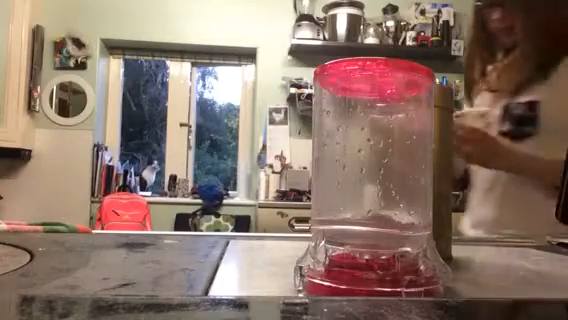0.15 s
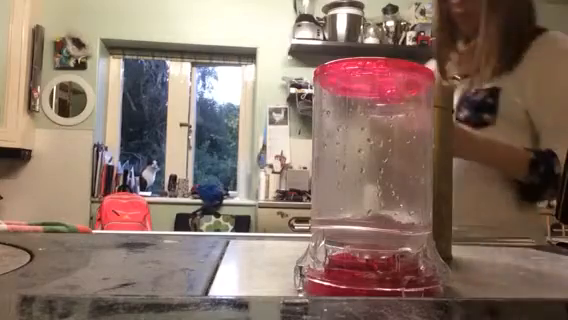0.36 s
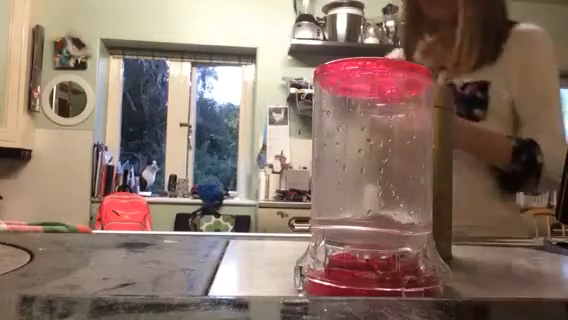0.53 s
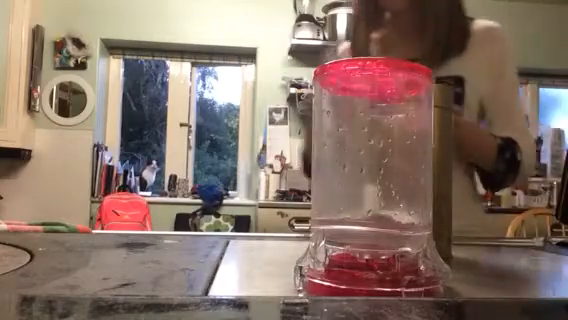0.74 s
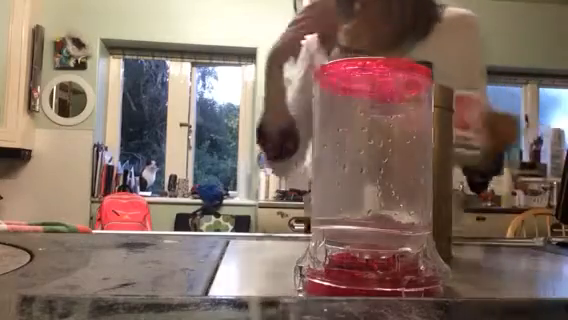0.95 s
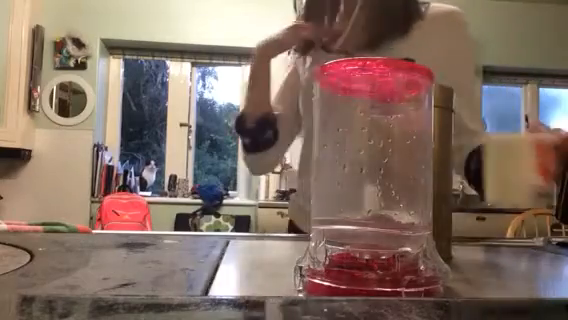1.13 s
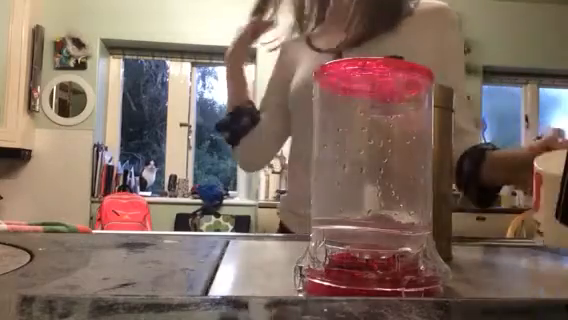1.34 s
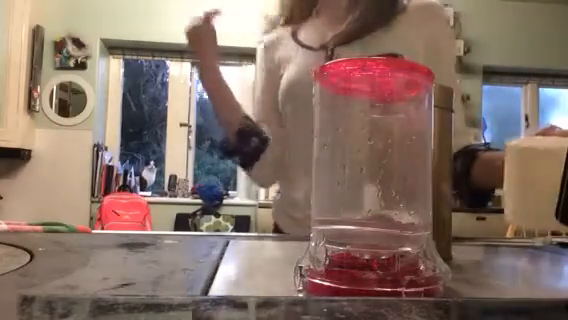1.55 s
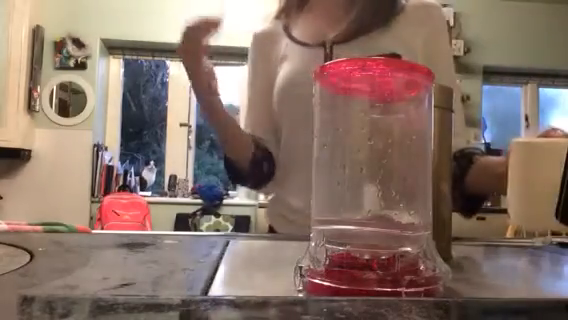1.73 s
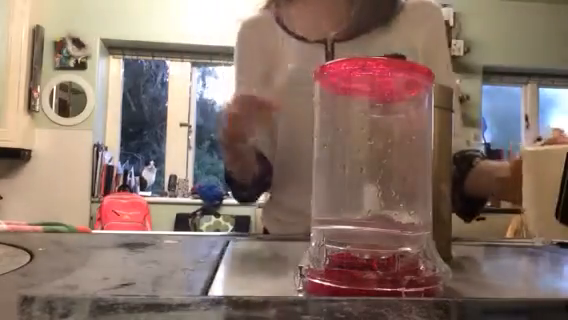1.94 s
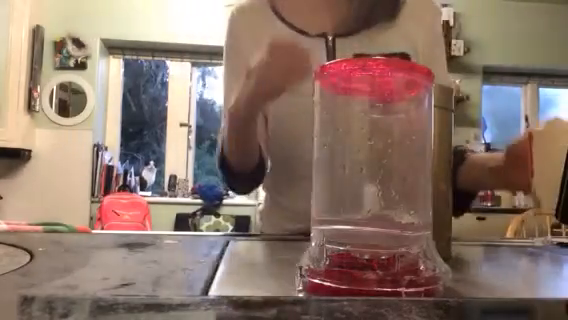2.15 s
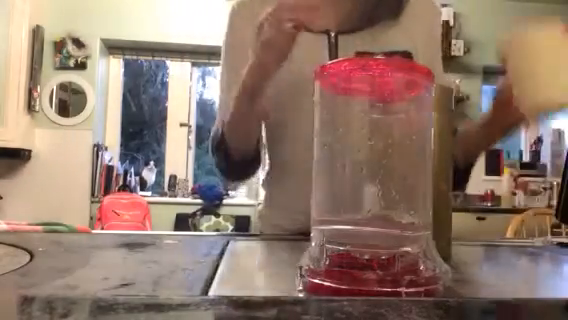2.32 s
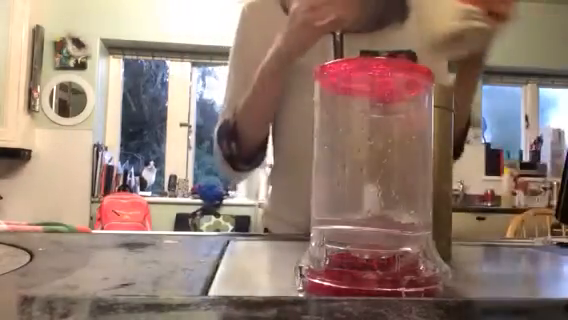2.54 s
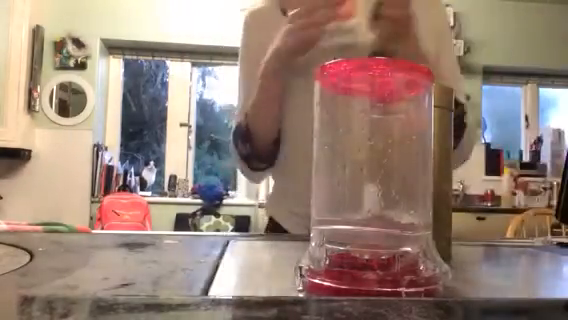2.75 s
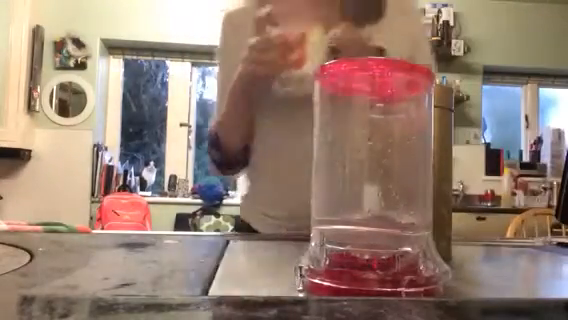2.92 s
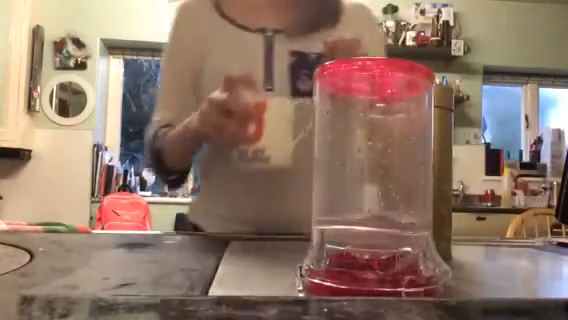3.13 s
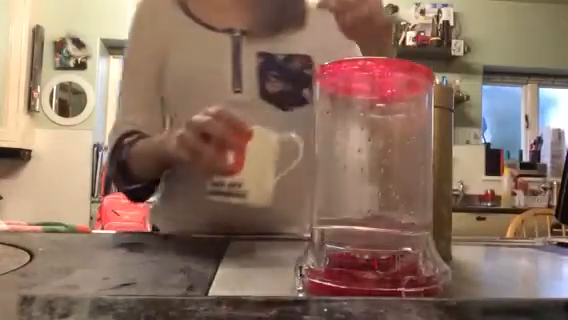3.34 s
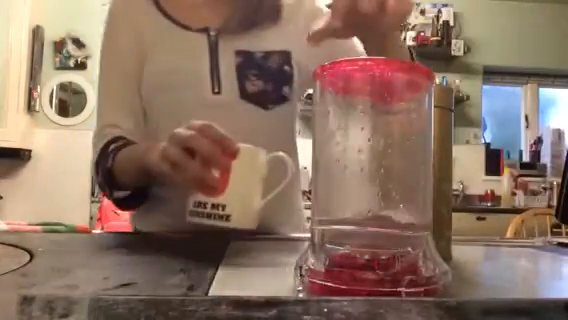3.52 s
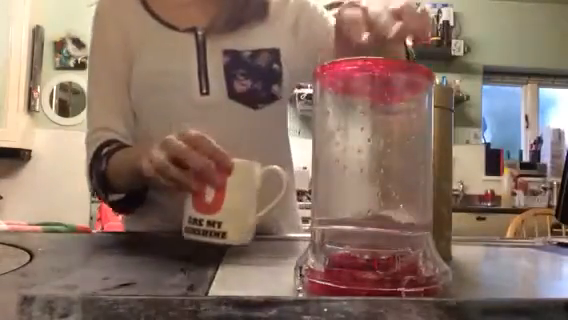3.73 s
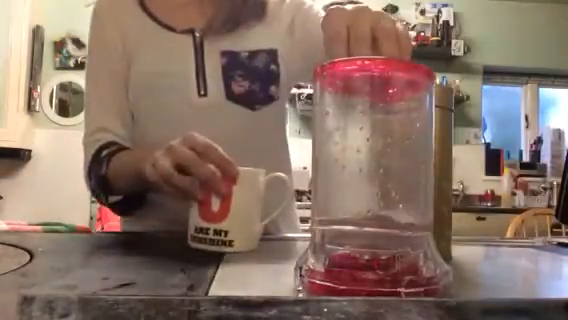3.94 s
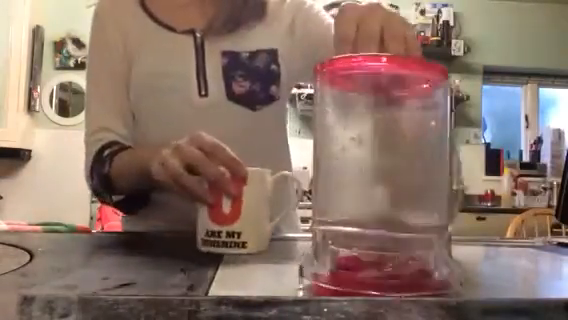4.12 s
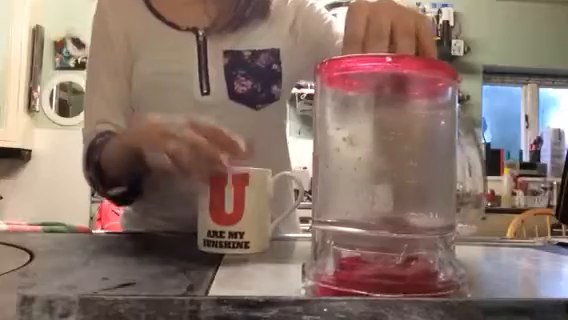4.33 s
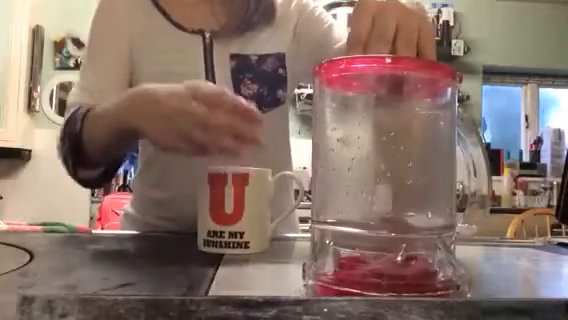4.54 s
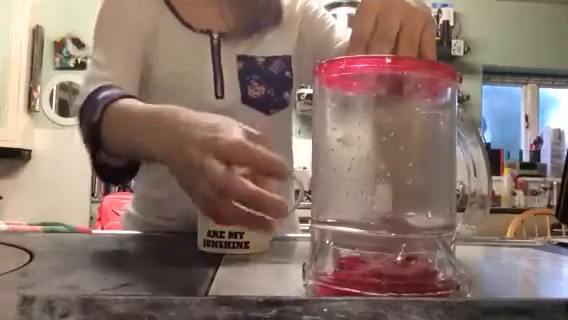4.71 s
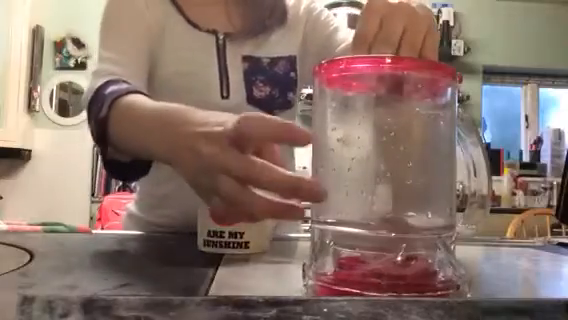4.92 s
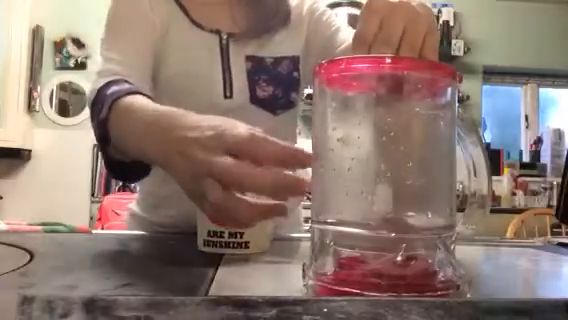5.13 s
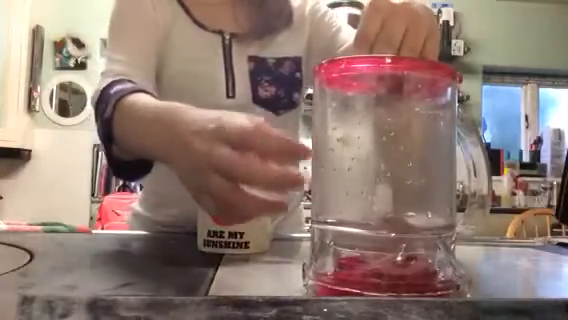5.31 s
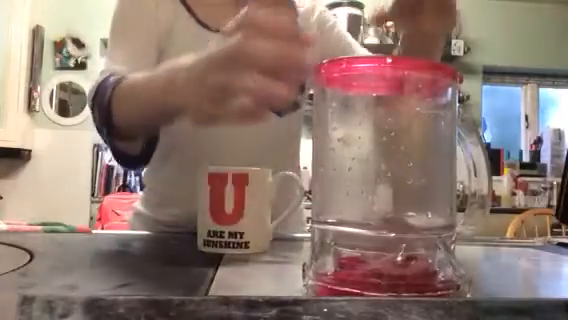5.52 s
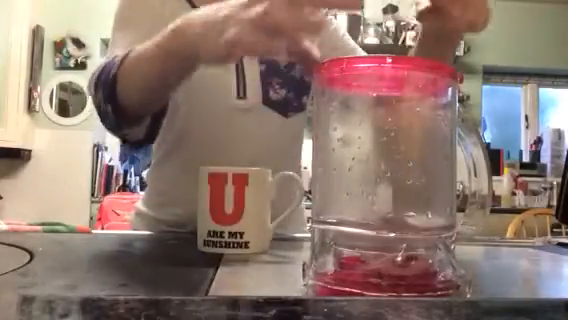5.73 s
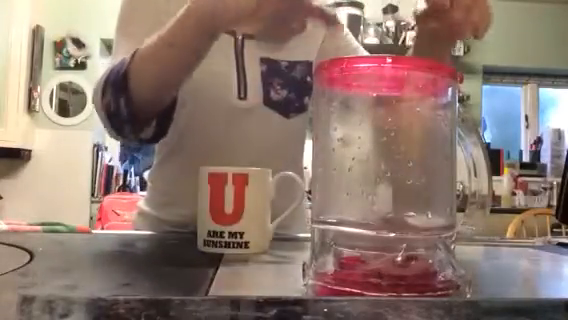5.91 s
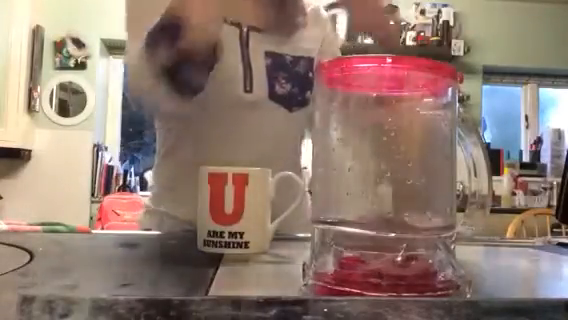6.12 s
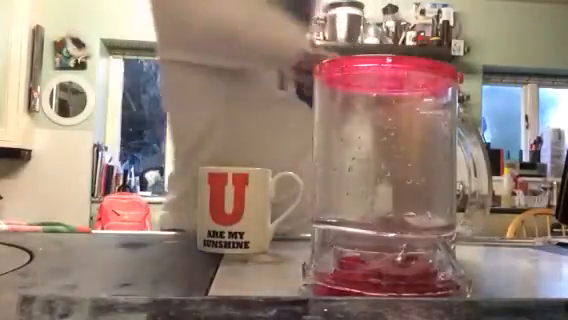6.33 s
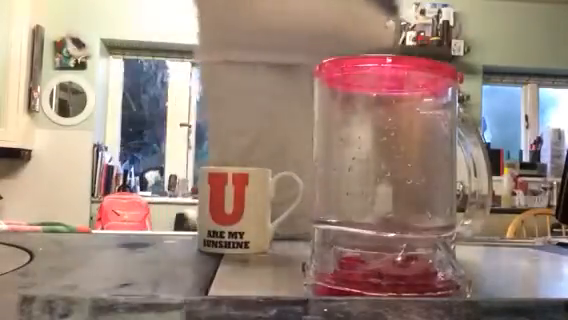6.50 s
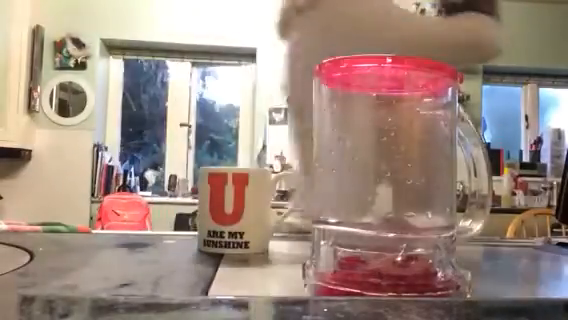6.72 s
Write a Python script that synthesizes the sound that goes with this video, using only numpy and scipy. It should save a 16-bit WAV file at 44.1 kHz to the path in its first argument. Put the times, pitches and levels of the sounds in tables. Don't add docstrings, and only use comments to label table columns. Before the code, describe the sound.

In a small hard kitchen, an appliance fan hisses steadily with a faint low hum. A few dull bumps come from further off. Then a ceramic mug lands with a loud sharp clunk on the worktop, grinds and rocks, clunks again flat and settles with tiny knocks. About a second later, nails tick and fingertips tap a hollow plastic jar. One close small microphone picks up low worktop wobbles.

```python
import sys
import numpy as np
from scipy import signal
from scipy.fft import rfft, irfft, next_fast_len
from scipy.io import wavfile

SR = 44100
rng = np.random.default_rng(int(sys.argv[2]) if len(sys.argv) > 2 else 0)


def unload_audio(sound):
    columns = np.transpose(np.atleast_2d(sound))
    steps = np.round(np.clip(columns, -1, 1) * 32767)
    wavfile.write(sys.argv[1], SR, steps.astype(np.int16))


def level_to_linear(level):
    exponent = np.asarray(level, float) / 20
    return 10 ** exponent


N = 302526

# f/Hz, level/dB, t60/s
EDGE_MODES = [(122, -18.5, 0.11), (240, -14, 0.052), (330, -17.5, 0.072), (526, -11.5, 0.074),
              (621, -18, 0.11), (560, -23, 0.034), (169, -28, 0.037), (880, -1.5, 0.042), (990, -17, 0.021),
              (915, -17, 0.028), (1193, -18, 0.033), (1415, -21, 0.039), (1520, -12, .035),
              (1740, -14, 0.064), (2410, -22.5, 0.042), (2665, -22.5, 0.038), (3040, -27, 0.035),
              (3530, -26, 0.032), (4460, -17.5, 0.018), (5100, -26, 0.038), (6950, -33, 0.022)]
# f/Hz, level/dB, t60/s
FOOT_MODES = [(147, -38, 0.19), (229, -18.5, 0.1), (360, -12, 0.08), (450, -11, 0.063), (536, -2, 0.07),
              (590, -23, 0.079), (825, -3.5, 0.02), (954, 1, 0.02), (1143, -18, 0.059), (1570, -37, 0.055),
              (1737, -1, 0.023), (2080, -14, 0.017), (2530, -36, 0.032), (2900, -30, 0.036),
              (3050, -27, 0.04), (3490, -23, 0.069), (3860, -18.5, 0.03), (4770, -26, .04),
              (4600, -31, 0.057), (5520, -26.5, 0.064), (7400, -27, .03)]
# ring t60/s, crack level re peak/dB
KNOCK_KINDS = [
    (0.048, -29),
    (0.061, -26.5),
    (0.11, -33),
    (0.067, -10),
]
CHATTER_KIND, TAP_KIND, BUMP_KIND, SNAP_KIND = KNOCK_KINDS


def rms_one(x):
    return x / np.sqrt(np.mean(x ** 2) + 1e-20)


def drift(rate):
    r = np.exp(-80 * np.pi * rate / SR)
    white = rng.standard_normal(N // 40 + 2002)
    slow = signal.lfilter([1], [1, -2 * r, r * r], white)[2000:]
    return np.interp(np.arange(N) / 40, np.arange(len(slow)), rms_one(slow))


def bandpass(x, low, high):
    return signal.sosfilt(signal.butter(2, [low, high], "band", fs=SR, output="sos"), x)


def ring(force, hz, t60):
    r = level_to_linear(-60 / (max(t60, .002) * SR))
    w = 2 * np.pi * hz / SR
    return signal.lfilter([0, np.sin(w)], [1, -2 * r * np.cos(w), r * r], force + 1e-18)


def click(soft_ms, size=SR // 2):
    force = np.zeros(size)
    shape = np.hanning(3 + int(np.clip(soft_ms, 0, 5) * SR / 1000))
    force[:len(shape)] = shape / shape.sum()
    return force


def body(force, modes):
    return sum((-1) ** k * level_to_linear(db) * ring(force, hz, t60) for k, (hz, db, t60) in enumerate(modes))


def crest(s, db, rise_db, fall_db):
    late = np.arange(N) / SR - s
    return level_to_linear(db + np.maximum(np.minimum(rise_db * late, -fall_db * late), -120))


def add(out, s, piece):
    at = round(s * SR)
    out[at:at + len(piece)] += piece[:N - at]


def crack(t60):
    # lower f/Hz, upper f/Hz, level/dB, t60 stretch/1
    grit_bands = [(950, 1750, 10, 1.5), (1420, 2870, 1.5, 1.76), (2850, 4000, -5, 1.1),
                  (4300, 7600, -12, 1.1), (9000, 15000, -17, 0.57)]
    t = np.arange(SR // 5) / SR
    out = 0
    for low, high, db, stretch in grit_bands:
        noise = rms_one(bandpass(rng.standard_normal(len(t)), low, high))
        out = out + noise * level_to_linear(db - 60 * t / (stretch * t60)) * np.minimum(t / 0.0016, 1)
    return out


def knocks(rows, kind):
    t60, crack_db = kind
    out = np.zeros(N)
    for s, db, hz in rows:
        modes = [(hz, -3, t60), (1.39 * hz, -7, 0.47 * t60), (0.804 * hz, -14, t60), (130, -8, .07)]
        add(out, s, level_to_linear(db) * body(click(soft_ms=0.98), modes))
        add(out, s, level_to_linear(db + crack_db) * crack(0.037))
    return out


def glaze_rings(rows):
    out = np.zeros(N)
    for s, db, hz, t60 in rows:
        add(out, s, level_to_linear(db) * ring(click(0), hz, t60))
    return out


def fan_air():
    # f/Hz, level per Hz/dB
    hiss = [(15, -33), (25, 2), (152, -0.5), (368, -7), (566, -7.5), (665, -10), (1140, -3.5), (1370, -13),
            (1750, -5), (2170, -10), (2690, -9.5), (3820, -14.5), (5130, -13), (6720, -17.5),
            (15500, -26.5)]
    hz_points, db_points = np.transpose(hiss)
    air_db = -.5 + 0.26 * np.arange(N) / SR
    edges = 28 * 2 ** np.arange(0, 9.6, .5)
    white = rng.standard_normal((2, N))
    out = 0
    for k, (low, high) in enumerate(zip(edges, np.minimum(edges[1:], .45 * SR))):
        level_db = np.interp(np.log(low * high) / 2, np.log(hz_points), db_points)
        flicker_db = 2.1 * (500 / (500 + low)) ** 0.17 * drift(19)
        out = out + level_to_linear(level_db + (low > 3000) * air_db + flicker_db) * bandpass(white[k % 2], low, high)
    return level_to_linear(-48 - 3) * rms_one(out)


def fan_housing():
    # f/Hz, bandwidth/Hz, rms level/dB
    housing = [(51.2, 2.9, -63), (95.4, 10, -61.5), (149.2, 10.2, -61), (567, 28, -62.5), (907, 85, -66),
               (1134.6, 28, -60), (1763, 165, -55.5), (1840, 35, -62), (2112, 152, -57.5),
               (2265, 104, -63.5), (3814, 40, -66.5), (6840, 1500, -66.5)]
    out = np.zeros(N)
    for hz, width, db in housing:
        t60 = np.log(1000) / (np.pi * width)
        once = ring(rng.standard_normal(N), hz, t60)
        twice = ring(once, hz, t60 / 3)
        out += level_to_linear(db + 1.0 * drift(12)) * rms_one(twice)
    return out


def far_knocks():
    # t/s, peak level/dB, body f/Hz
    far_bumps = [
        (0.269, -40, 193),
        (1.091, -39, 563),
        (2.58, -42, 210),
        (4.956, -42, 120),
    ]
    # t/s, peak level/dB, body f/Hz
    snaps = [
        (1.50, -43.5, 450),
        (4.906, -44, 585),
    ]
    # t/s, level/dB, f/Hz, t60/s
    clink = [
        (3.14, -45.5, 3250, 0.21),
    ]
    return knocks(far_bumps, BUMP_KIND) + knocks(snaps, SNAP_KIND) + glaze_rings(clink)


def worktop_shake():
    # t of the crest/s, level/dB
    jolts = [
        (4.0, -40),
        (4.25, -43),
        (4.58, -38),
        (4.95, -34),
        (5.17, -42),
        (5.35, -39),
        (5.53, -40),
        (6.08, -46),
        (6.19, -45),
        (6.61, -44),
    ]
    gain = sum(crest(s, db - 10.5, rise_db=138, fall_db=126) for s, db in jolts)
    return gain * rms_one(bandpass(rng.standard_normal(N), 50, 130))


def mug_rolling():
    # t of the crest/s, level/dB, weight on the whole foot/1
    rolls = [
        (3.96, -46, 0.6),
        (4.01, -32.5, 0.65),
        (4.11, -37.5, .6),
        (4.17, -46, 1.0),
        (4.24, -44, .7),
        (4.28, -33, 0.2),
        (4.36, -48.5, 0.06),
    ]
    heights = level_to_linear(4.3 * np.minimum(rng.exponential(1, N), 3))
    grains = (rng.random(N) < 900 / SR) * heights * rng.choice([-1, 1], N)
    grains = signal.lfilter([.12], [1, -.9], grains)
    damped = [[(hz, db / 2, t60) for hz, db, t60 in modes] for modes in (EDGE_MODES, FOOT_MODES)]
    edge, foot = (rms_one(body(grains, modes)) for modes in damped)
    out = np.zeros(N)
    for s, db, flat in rolls:
        mixed = edge + np.clip(flat, 0, 1) * (foot - edge)
        out += crest(s, db, rise_db=450, fall_db=183) * mixed
    return out


def mug_chatter():
    # t/s, peak level/dB, body f/Hz
    chatter = [
        (3.956, -27, 450),
        (3.968, -31, 292),
        (4.028, -30, 260),
        (4.044, -26, 208),
        (4.056, -34, 278),
        (4.070, -31, 220),
        (4.308, -31, 550),
        (4.476, -34.5, 483),
        (4.486, -34, 330),
        (4.551, -24.5, 414),
    ]
    return knocks(chatter, CHATTER_KIND)


def mug_blows():
    # t/s, peak level/dB, contact softness/ms, crack level/dB, crack t60/s
    landing = [
        (3.9915, -4.5, 0.1, -26.5, 0.013),
        (3.9975, -17.5, 0.097, -37, 0.044),
    ]
    rocking = [
        (4.0915, -22, 0.73, -43.5, 0.023),
        (4.0985, -22.5, .9, -56, .03),
        (4.2548, -16.5, 0.96, -48, 0.029),
        (4.2566, -10.5, .12, -33, 0.047),
        (4.262, -23.5, 0.18, -37, 0.025),
    ]
    out = np.zeros(N)
    for blows, modes in ((landing, EDGE_MODES), (rocking, FOOT_MODES)):
        for s, db, soft_ms, crack_db, t60 in blows:
            add(out, s, level_to_linear(db) * body(click(soft_ms), modes))
            add(out, s, level_to_linear(crack_db) * crack(t60))
    return out


def mug_glaze():
    # t/s, level/dB, f/Hz, t60/s
    glaze = [
        (4.352, -38, 905, .05),
        (4.3595, -31, 915, .05),
        (4.3638, -34, 915, .03),
        (4.092, -41, 2400, .02),
        (4.091, -45, 4600, .015),
        (4.097, -28, 550, .06),
        (4.135, -37, 900, .05),
    ]
    return glaze_rings(glaze)


def nail_ticks():
    # t/s, peak level/dB, t60 stretch/1, tilt/dB per octave
    ticks = [
        (5.1487, -24.5, 1.65, -4.5),
        (5.3118, -32, 1.0, 1.5),
        (5.3145, -41, 1.5, -1),
    ]
    # f/Hz, level/dB, t60/s
    tick_modes = [(1070, -7.5, 0.0032), (2080, -11, .003), (3270, -10, .003), (4600, -6, .004),
                  (6400, 2, 0.0045), (7840, 1, 0.0041), (9300, 0, 0.0034), (10600, -9, 0.0041),
                  (12300, -2, .002), (14000, -10, .002)]
    out = np.zeros(N)
    for s, db, stretch, tilt in ticks:
        modes = [(hz, level_db + tilt * np.log2(hz / 7000), stretch * t60) for hz, level_db, t60 in tick_modes]
        add(out, s, level_to_linear(db - 8) * body(click(0), modes))
    return out


def jar_taps():
    # t/s, peak level/dB, body f/Hz
    taps = [(5.150, -25.5, 496), (5.165, -35, 110), (5.313, -27.5, 580), (5.324, -39, 590),
            (5.338, -33, 560), (5.388, -39, 527), (5.401, -37, 500), (5.526, -30.5, 590), (5.553, -35, 482),
            (5.805, -40.5, 330), (6.057, -39, 590)]
    return knocks(taps, TAP_KIND)


def kitchen(x):
    room_t60_s, wall_cut_hz = .33, 1450
    size = next_fast_len(N + SR)
    w = 2 * np.pi * np.arange(size // 2 + 1) / size
    dull = 1 / (1 + 1j * w * SR / (2 * np.pi * wall_cut_hz))
    response = 0
    for k, lag in enumerate(rng.uniform(.008, .035, 10)):
        loop = level_to_linear(-60 * lag / room_t60_s) * dull * np.exp(-1j * w * SR * lag)
        response = response + (-1) ** k * loop / (1 - loop)
    return irfft(rfft(x, size) * response, size)[:N]


def scene():
    steady = fan_air() + fan_housing() + worktop_shake()
    mug = mug_rolling() + mug_chatter() + mug_blows() + mug_glaze()
    hits = far_knocks() + mug + nail_ticks() + jar_taps()
    room_db = -21.5
    return (hits + level_to_linear(room_db) * kitchen(hits) + steady)[None]


def top_cut(x):
    return signal.sosfilt(signal.butter(12, 15340, fs=SR, output="sos"), x)


def record(dry):
    # f/Hz, bandwidth/Hz, level/dB
    mic_peaks = [(4640, 670, 1.5), (5050, 260, -4.5), (6320, 280, 3), (7840, 310, 6), (8700, 1200, -2.5),
                 (10700, 600, 2), (12300, 1800, -1.5), (13900, 700, -4), (15000, 700, -1)]
    x = signal.sosfilt(signal.butter(3, 42, "high", fs=SR, output="sos"), dry)
    for hz, width, db in mic_peaks:
        x = x + (level_to_linear(db) - 1) * signal.lfilter(*signal.iirpeak(hz, hz / width, fs=SR), x)
    x = signal.sosfilt(signal.ellip(10, .5, 50, 15450, fs=SR, output="sos"), x)
    mix = 0.78 * np.tanh(x / 0.81)
    return top_cut(mix)


dry = scene()
out = record(dry)
unload_audio(out)
```